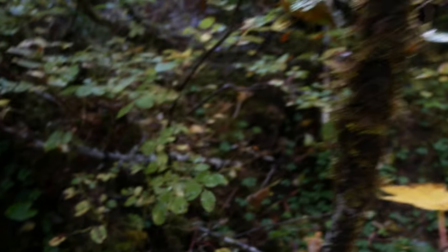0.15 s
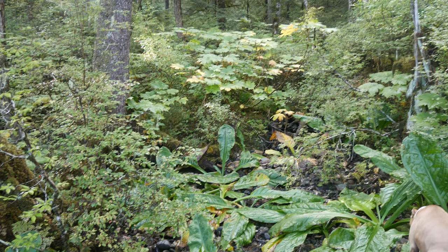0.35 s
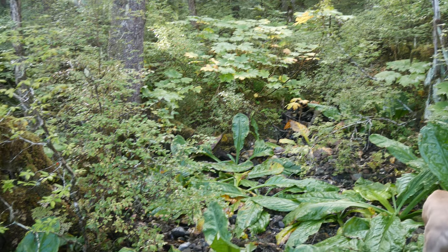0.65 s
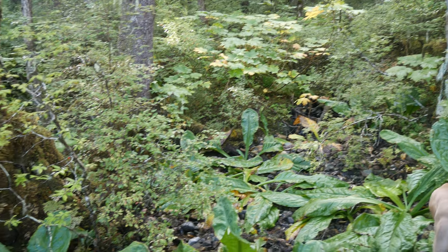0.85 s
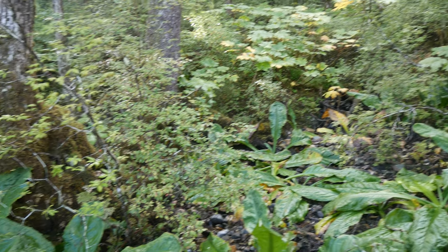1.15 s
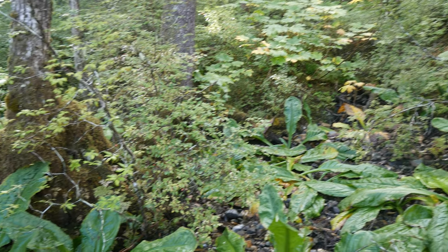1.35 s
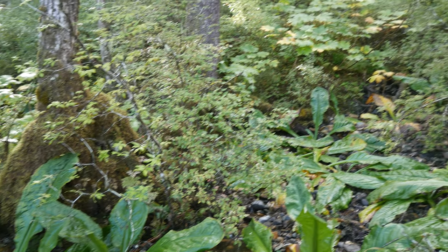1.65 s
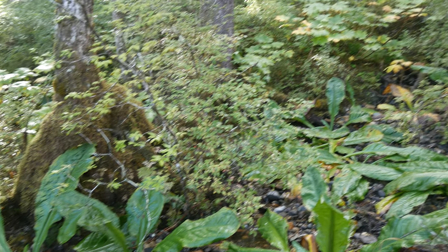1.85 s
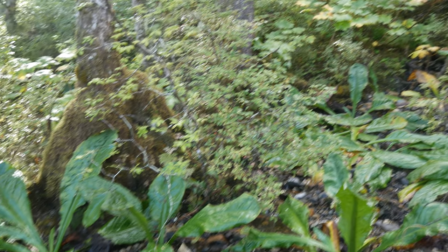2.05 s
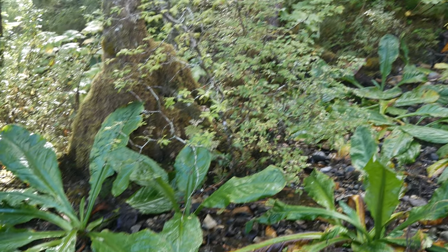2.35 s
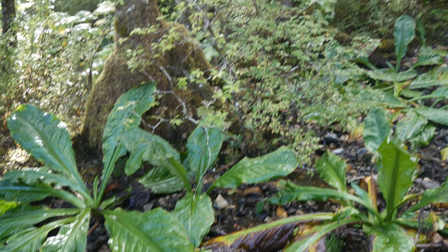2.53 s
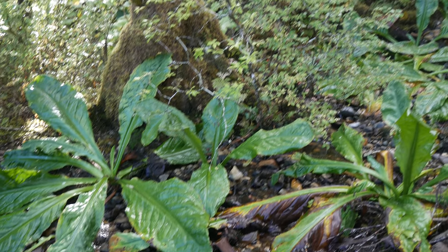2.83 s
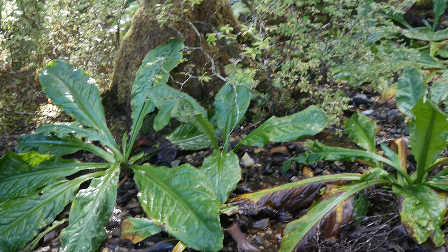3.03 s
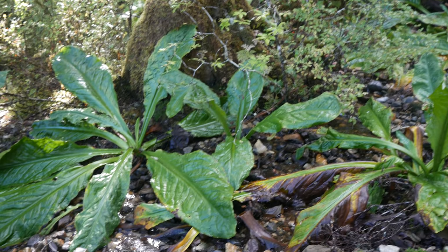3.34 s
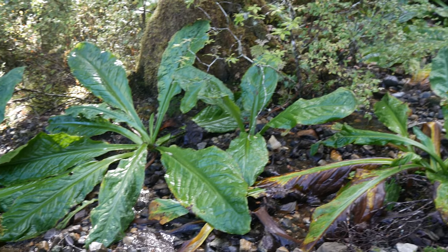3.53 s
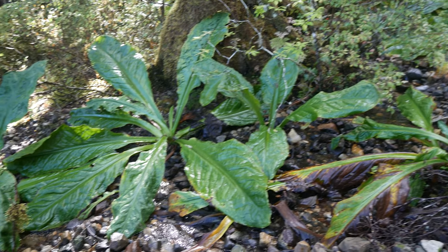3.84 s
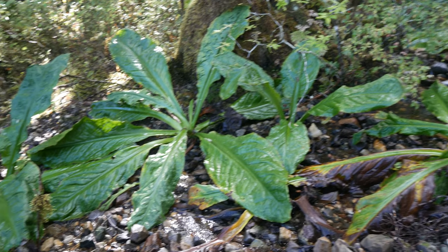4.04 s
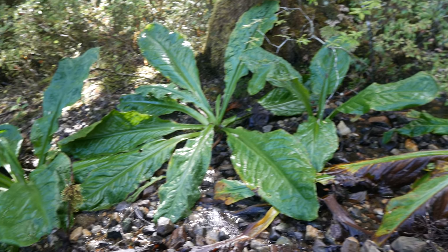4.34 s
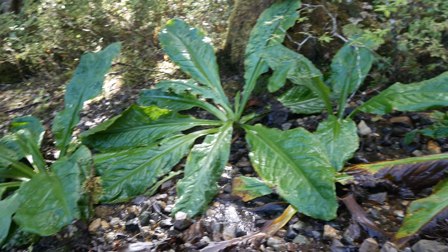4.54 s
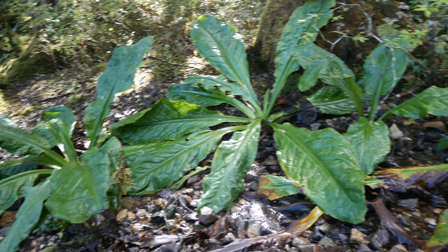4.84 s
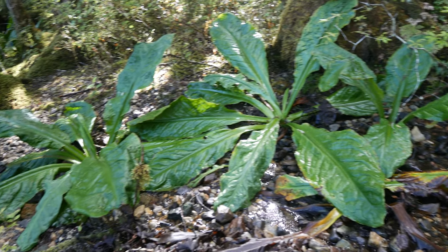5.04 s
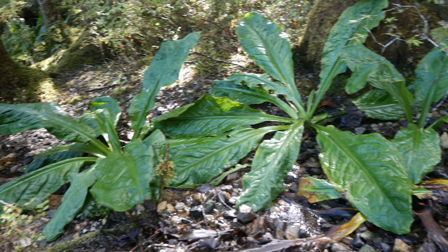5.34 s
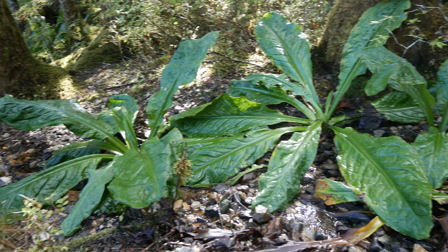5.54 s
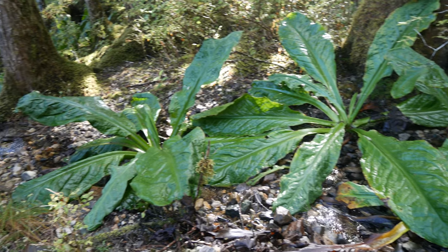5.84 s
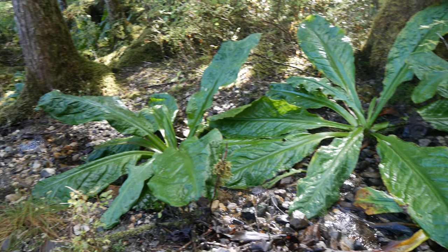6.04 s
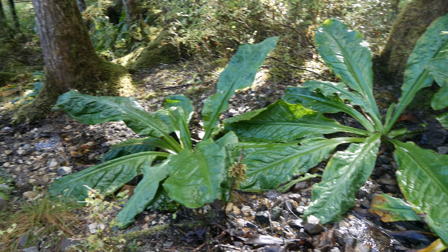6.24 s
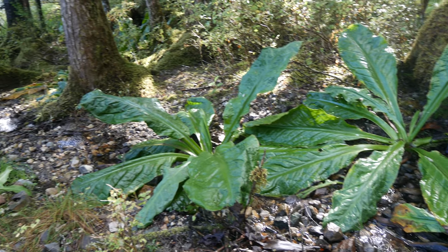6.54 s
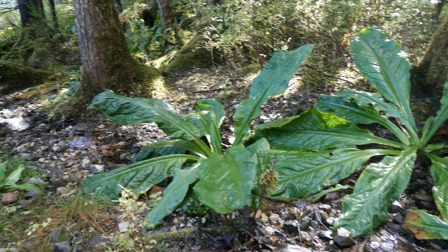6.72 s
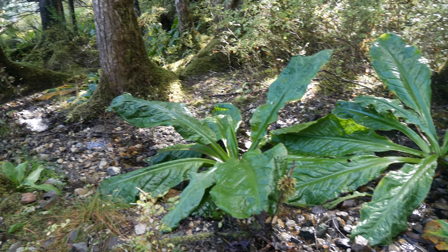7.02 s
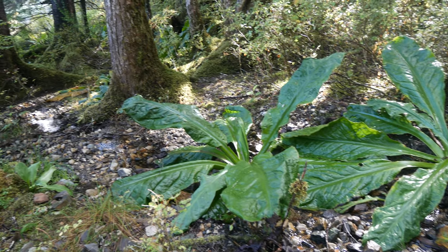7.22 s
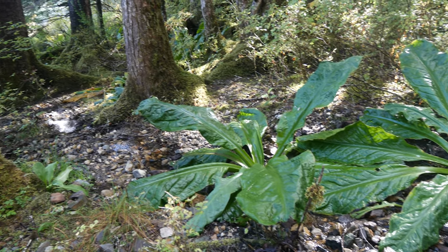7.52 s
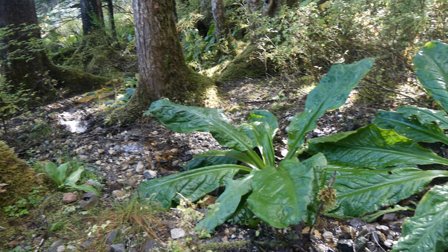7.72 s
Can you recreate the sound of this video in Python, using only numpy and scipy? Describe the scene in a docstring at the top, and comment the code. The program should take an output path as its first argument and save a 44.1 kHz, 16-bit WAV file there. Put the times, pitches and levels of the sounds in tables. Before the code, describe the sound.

Scuffing fingers and thumps on the casing open the scene, followed by a quarter-second of complete silence. A small stream then babbles and fizzes steadily outdoors, fairly near, with irregular plinks, ticks and rounder plops. A crisp click comes early, then a quick cluster of leaf crunches with knocks. Faint low hand rumble and occasional dull thuds continue at the microphone while the water gradually softens to the end.

```python
"""A small stream trickles over gravel in a damp forest, heard from a hand-held camera.
At first the camera is fumbled: bumps, rubs and creaks of coloured noise, and short taps. Then all sound drops out briefly.
The stream enters after that: noise for far water, swarms of gliding tones for bubbles, single tones for drips and plops.
As the camera pans slowly away the water gets softer overall; gritty noise makes a sharp click and crunching leaves.
Low rumble and soft thuds of the grip, which are short tones falling in pitch, carry on to the end."""
import sys
import numpy as np
from scipy import signal
from scipy.fft import rfft, irfft, next_fast_len
from scipy.io import wavfile
from scipy.ndimage import uniform_filter1d, map_coordinates

SR = 44100
rng = np.random.default_rng(int(sys.argv[2]) if len(sys.argv) > 2 else 0)


def unload_wav(signal):
    """Save mono or channel-first audio to the path in sys.argv[1] as 16-bit WAV at rate SR, clipped to [-1, 1]."""
    wavfile.write(
        sys.argv[1],
        SR,
        np.round(np.clip(np.atleast_2d(signal).T, -1, 1) * 32767).astype(np.int16),
    )


N = 347314  # length in samples
TOP_HZ = 15850  # nothing is kept from here up

# All colours below give relative levels; the noise is brought to rms 1 afterwards.
# When the sound drops out: start [t/s], end [t/s]
DROPOUT = (.289, .5562)
# Colour of the hand tremor on the housing: [f/Hz, level/dB]
RUMBLE_COLOUR = [(3, -23), (8, -13.5), (14, 4), (23, -9), (33, -12), (65, -16), (100, -20.5), (190, -25),
                 (300, -29), (500, -81)]
# Strength of the tremor, before its random wobble: [t/s, level/dB]
TREMOR = [(0.56, -60), (1.04, -52.5), (1.5, -58), (1.93, -49.5), (3.1, -55), (3.8, -51), (5, -56),
          (6.2, -57), (6.84, -54.5), (7.4, -60), (7.88, -54)]
# Strength of the fumbling: [t/s, bumping level/dB, rubbing level/dB, creak level/dB]
FUMBLE = [(0.0, -38, -35.5, -62), (0.046, -40.5, -36, -55), (0.094, -35, -40.5, -37.5),
          (0.118, -43, -42.5, -38), (0.142, -45.5, -42, -39), (0.176, -43.5, -44.5, -51.5),
          (0.28, -34, -43, -43), (0.29, -26.5, -52.5, -41.5)]
# Colour of the camera swinging in the hand: [f/Hz, level/dB]
BUMP_COLOUR = [(3, -7), (16, 2), (26, -9), (38, -0.5), (52, -16), (100, -18), (200, -24), (400, -56.5)]
# Colour of fingers on the housing: [f/Hz, level/dB]
RUB_COLOUR = [(71, -37.5), (120, -13), (964, -8.5), (1570, -8), (1670, -6), (1780, -9), (4650, -15),
              (11900, -24.5), (15800, -32.5)]
# Colour of the housing as it flexes: [f/Hz, level/dB]
CREAK_COLOUR = [(70, -28), (150, -11.5), (330, -8.5), (470, -5), (650, -13), (1100, -15.5), (1800, -42.5)]
# Thuds of the grip, before their tail: [t/s, peak level/dB, pitch f/Hz, rise t/ms]
THUDS = [(1.08, -37.5, 366, 2.3), (1.764, -33.5, 328, 2.1), (1.784, -37, 422, 2.1), (1.797, -33, 442, 3.3),
         (1.813, -40, 423, 2.7), (1.862, -35.5, 297, 1.8), (2.688, -50.5, 225, 4.3), (3.73, -51, 326, 9.3),
         (4.105, -38.5, 226.5, 3.6), (4.108, -41, 396, 3.7), (4.113, -34.5, 128, 4.1),
         (4.142, -55, 150, 4.3), (5.217, -47.5, 113, 6), (5.778, -51.5, 136, 5.4), (5.971, -49.5, 102, 6),
         (6.101, -34.5, 434, 0.58), (6.598, -47.5, 149, 3.5), (6.9525, -37.5, 706, 1.4),
         (7.557, -54, 120, 7.1)]
# Bursts of leaf litter, and one sharp broadband click at 0.63 s, before the rise and fall shape them:
# [t/s, level/dB, rise t/ms, fall t/ms]
CRUNCHES = [(0.12, -32.5, 0.55, 3.1), (0.138, -30.5, .5, 3), (0.555, -34.5, 0.83, 22),
            (0.6306, -26.5, .1, 1.5), (1.74, -44, 8, 20), (1.765, -43, 2.6, 19), (1.7842, -26, 1.5, 6.8),
            (1.797, -26.5, 4, 11.6), (1.8107, -28, 2, 4.1), (1.861, -24.5, 0.62, 4.1),
            (4.352, -41, 0.27, 1.4), (6.9523, -33, 0.525, 3.4)]
# Colour of the leaf litter and the click: [f/Hz, level/dB]
LITTER_COLOUR = [(290, -10), (500, -4.5), (677, -6.5), (1400, -0.5), (3680, -7.5), (4250, -11.5),
                 (5280, -17.5), (11900, -22), (15800, -35)]
# Short taps and clicks of the fumbled camera, then the loudest bubbles and splats, before impact and tail:
# [t/s, peak level/dB, pitch f/Hz, rise t/ms]
TAPS_AND_DROPS = [(0.015, -30.5, 2720, 1.0), (0.0286, -25, 2010, .34), (0.1386, -31, 2170, .44),
                  (0.1384, -26.5, 780, .7), (0.154, -33.5, 1930, 0.74), (0.5576, -23.5, 1055, 0.83),
                  (0.6299, -16, 3920, .073), (0.644, -33, 2300, 1.1), (0.6432, -27, 6640, .087),
                  (0.684, -31, 6950, .09), (0.7165, -31, 6330, .37), (0.7368, -30, 7910, .27),
                  (0.8275, -31, 6800, .27), (0.9248, -28.5, 6640, 0.16), (1.067, -36, 1750, 2.0),
                  (1.0747, -31, 1630, 1.1), (1.1892, -35, 2390, 1.0), (1.213, -38, 2010, 2.1),
                  (1.2482, -28.5, 8030, 0.18), (1.3422, -28, 7460, 0.3), (1.3834, -30.5, 2780, .76),
                  (1.4771, -29, 3930, .38), (1.484, -26.5, 2150, 1.75), (1.591, -34.5, 1690, 3.2),
                  (1.714, -37.5, 2140, 3.7), (1.8607, -31.5, 4260, .81), (1.954, -29, 2670, 0.33),
                  (1.9963, -31, 6530, .45), (2.132, -32.5, 2370, 0.84), (2.1704, -30, 6400, 0.27),
                  (2.206, -28, 6850, .21), (2.4323, -28, 1970, .39), (2.6583, -33, 7650, 0.21),
                  (2.6994, -37, 1750, 5.4), (2.704, -24, 3520, 0.37), (2.722, -34, 2090, 1.8),
                  (2.75, -34.5, 1470, 2), (2.8431, -26.5, 2400, 0.43), (2.863, -28.5, 2120, 1.0),
                  (2.884, -39, 1660, 2.4), (2.9055, -35, 5510, .53), (2.93, -35.5, 1580, 2.7),
                  (2.97, -28, 1900, 0.45), (3.071, -39.5, 2730, 2.2), (3.1032, -29, 2810, .21),
                  (3.1536, -28, 1630, 1.6), (3.159, -34, 1720, 1.7), (3.3, -26.5, 7250, .091),
                  (3.32, -35.5, 1820, 1.1), (3.4926, -25, 4700, 0.12), (3.5195, -35.5, 4960, .95),
                  (3.5533, -27.5, 6250, 0.14), (3.6405, -25, 2410, 0.46), (3.647, -26, 1540, 2.5),
                  (3.847, -31.5, 1900, 0.79), (3.999, -36, 4630, .6), (4.1539, -32.5, 7950, .43),
                  (4.3529, -26.5, 7570, .2), (4.351, -31, 3140, 0.3), (4.392, -33, 7900, 0.31),
                  (4.6927, -35, 925, 2.2), (4.948, -31.5, 7700, .25), (5.0279, -40, 1520, 1.5),
                  (5.0354, -38, 2900, 1.94), (5.07, -40, 2120, 2.1), (5.093, -43, 1750, 3.1),
                  (5.11, -39, 2190, 3.1), (5.137, -42, 1780, 2.1), (5.164, -38, 2000, .92),
                  (5.169, -35, 4800, .42), (5.1837, -25, 4760, .54), (5.2685, -26, 5200, .36),
                  (5.2727, -36.5, 1180, 1.8), (5.397, -26, 2580, 0.35), (5.436, -33, 1640, 2.1),
                  (5.7375, -32.5, 5130, 0.49), (5.795, -31, 2260, 0.45), (5.8578, -31.5, 4800, 0.9),
                  (5.8759, -31, 4900, .72), (5.8774, -26.5, 1660, 1.8), (5.883, -26.5, 1920, 0.93),
                  (5.954, -31.5, 4560, .29), (6.0044, -28, 1650, 0.66), (6.03, -37.5, 1010, 3.13),
                  (6.047, -24.5, 4730, 0.16), (6.18, -30, 2960, .61), (6.1869, -33.5, 8470, .53),
                  (6.4618, -33, 1450, 1.76), (6.61, -35.5, 4000, .72), (6.61, -29, 1730, .99),
                  (6.649, -33, 1230, 1.7), (6.7121, -30, 2380, .4), (6.953, -36, 1070, .8),
                  (6.953, -38, 2140, 0.41), (7.0058, -31, 3140, .61), (7.03, -32.5, 4500, .46),
                  (7.0882, -33.5, 6900, .35), (7.232, -38, 4200, 1.52), (7.29, -31.5, 1700, 1.5),
                  (7.2984, -28, 7700, .51), (7.3315, -35.5, 2400, 1.1), (7.474, -30, 2950, 0.21),
                  (7.476, -31, 1710, 0.38), (7.49, -32.5, 8500, 0.22), (7.5594, -40, 2840, .9),
                  (7.6688, -37.5, 1650, 1.54)]
# Turning away from the water: [t/s, level/dB], scaled for each layer by its share
TURNING_AWAY = [(0.56, 0), (1.1, -0.5), (1.9, 0), (2.7, -2), (3.1, -3), (3.6, -2), (4.3, -3.5), (4.9, -3.5),
                (5.8, -3.5), (6.8, -4), (7.88, -6)]
# Gurgle, babble, fizz, spray: [starting level/dB, share: dB lost for each dB of turning away]
LAYERS = [(-54.5, 1.8), (-45, 1.0), (-50, 0.35), (-58, 1)]
# Colour of the far water: [f/Hz, level/dB]
WASH_COLOUR = [(88, -58), (150, -19.5), (259, -5), (382, -9), (543, -4.5), (714, -6), (1750, -2),
               (2850, -7.5), (4640, -9), (6720, -13.5), (8320, -13), (13300, -19), (14900, -24),
               (15800, -47)]
# Left-right difference compared with the common sound: [f/Hz, level/dB]
SIDEWAYS = [(60, -25.5), (200, -20.5), (700, -19), (1290, -26.5), (2380, -21.5), (4400, -18.5), (8120, -15),
            (15000, -8)]


def amp(db):
    """Turn decibels into a plain gain."""
    return 10 ** (np.asarray(db) / 20)


def unit(x):
    """Scale a sound to rms 1."""
    return x / np.sqrt(np.mean(x ** 2) + 1e-20)


def along(points, hz):
    """Read a value at each frequency from (f, value) points, on a log frequency axis."""
    f, value = np.transpose(points)
    return np.interp(np.log(hz + 1), np.log(f + 1), value)


def curves(rows):
    """Join the rows into one curve over time for each column after the time."""
    t, *columns = np.transpose(rows)
    return [np.interp(np.arange(N) / SR, t, column) for column in columns]


def wobble(rate):
    """A smooth random curve with `rate` random points a second."""
    knots = rng.standard_normal(int(N * rate / SR) + 4)
    return map_coordinates(knots, [np.arange(N) * rate / SR])


def filtered(x, response):
    """Multiply each frequency of a sound by a gain."""
    size = next_fast_len(N + 8192)
    gain = response(np.fft.rfftfreq(size, 1 / SR))
    return irfft(rfft(x, size) * gain, size)[..., :N]


def noise(colour, patchy_db):
    """Coloured noise of rms 1 whose gain varies in random patches of time and frequency."""
    z = signal.stft(rng.standard_normal(N), nperseg=256)[2]
    patches = rng.standard_normal(z.shape)
    for axis in (0, 1):
        patches = uniform_filter1d(patches, 5, axis)
    x = signal.istft(z * amp(patchy_db * unit(patches)), nperseg=256)[1][:N]
    return unit(filtered(x, lambda hz: amp(along(colour, hz))))


def blips(s, db, hz, rise_ms, glide, size):
    """Tones that swell and die away over `size` samples; pitch climbs if glide is positive, else falls."""
    t = np.arange(size) / SR
    u = t * 1000 / np.clip(rise_ms, .03, 20)[:, None]  # time counted in rises
    pitch = hz[:, None]
    cycles = pitch * t * (1 + glide * (u / 2 - 1.5))
    swell = u * np.exp(1 - u)  # peaks at 1
    playable = pitch * (1 + glide * u) < SR / 2 - 1
    wave = amp(db)[:, None] * swell * np.sin(2 * np.pi * cycles) * playable
    at = np.round(s * SR).astype(int)[:, None] + np.arange(size)
    return np.bincount(at.ravel(), wave.ravel(), N + size)[:N]  # add up all the tones


def swarm(count, centre_hz, octaves, cycles, spread_db, glide, size):
    """Bubbles at random times, with pitches spread in octaves and uneven levels; rms 1."""
    when, loud = rng.random((count, 2)).T
    pitch, life = rng.standard_normal((count, 2)).T
    hz = np.clip(centre_hz * 2 ** (octaves * pitch), 150, 14000)
    db = np.minimum(-spread_db * np.log(loud + 1e-9), 3.3 * spread_db)
    db = db - 2.76 * life - 1.5 * pitch ** 2  # long ringers and odd sizes are softer
    rise_ms = cycles * 1000 / hz * np.exp(0.53 * life)
    return unit(blips(when * N / SR, db, hz, rise_ms, glide, size))


def noisy_tail(x, t60, level_db):
    """Add a short noisy tail to each sound; it dies by 60 dB in t60 seconds."""
    t = np.arange(SR // 10) / SR
    tail = rng.standard_normal(len(t)) * amp(-60 * t / t60) * (t > .0015)
    tail = tail / np.linalg.norm(tail)
    return x + amp(level_db) * signal.fftconvolve(x, tail)[:N]


def hand_rumble():
    """Hand tremor shakes the housing: low noise with a wandering level."""
    tremor_db, = curves(TREMOR)
    return noise(RUMBLE_COLOUR, patchy_db=0.8) * amp(tremor_db + 0.87 * wobble(5.6))


def fumbling():
    """The camera swings, fingers rub it and its housing flexes: three noises at the start."""
    bump_db, rub_db, creak_db = curves(FUMBLE)
    early = np.arange(N) / SR < DROPOUT[1]
    bump = amp(bump_db) * noise(BUMP_COLOUR, patchy_db=0.7)
    gritty = noise(RUB_COLOUR, patchy_db=-0.8) * amp(1.9 * wobble(200))
    rub = amp(rub_db) * unit(gritty)
    creak = amp(creak_db) * noise(CREAK_COLOUR, patchy_db=-0.1)
    return early * (bump + rub + creak)


def grip_thuds():
    """The grip gives soft knocks: short tones that fall in pitch, with a noisy tail."""
    knocks = blips(*np.transpose(THUDS), glide=-0.075, size=3000)
    return noisy_tail(knocks, t60=0.21, level_db=-2.0)


def crunches_and_click():
    """Leaf litter gives way in short gritty bursts of fast-wobbling noise; one burst is a sharp click."""
    grit = unit(noise(LITTER_COLOUR, patchy_db=0.0) * amp(2.5 * wobble(600)))
    t = np.arange(N) / SR
    shape = np.zeros(N)
    for s, db, rise_ms, fall_ms in CRUNCHES:
        age_ms = np.maximum(t - s, 0) * 1000
        shape += amp(db) * (1 - np.exp(-age_ms / rise_ms)) * np.exp(-age_ms / fall_ms)
    return shape * grit


def taps_and_drops():
    """Taps of the fumbled camera, then drips and plops: short rising tones; faint ones fall at random."""
    s, db, hz, rise_ms = np.transpose(TAPS_AND_DROPS)
    ring = blips(s, db, hz, np.maximum(rise_ms, .1), glide=0.024, size=1000)
    # each also gets a small bright impact
    impact = blips(s, db - 11.5, 1.5 * hz, np.maximum(.5 * rise_ms, .1), glide=0.0064, size=300)
    plinks = amp(-58) * swarm(count=110, centre_hz=1916, octaves=0.416, cycles=4.85,
                              spread_db=1.5, glide=0.033, size=1000)
    ticks = amp(-60.5) * swarm(count=45, centre_hz=4500, octaves=.12, cycles=2.2,
                               spread_db=2.5, glide=0.034, size=300)
    spits = amp(-64) * swarm(count=25, centre_hz=7700, octaves=0.13, cycles=2.9,
                             spread_db=-0.5, glide=0.046, size=200)
    return noisy_tail(ring + impact + plinks + ticks + spits, t60=0.035, level_db=-9.0)


def stream():
    """Far water merges into noise; nearer bubbles gurgle, babble and fizz, and fine spray ticks in flurries."""
    away_db, = curves(TURNING_AWAY)
    gurgle_db, babble_db, fizz_db, spray_db = [db + share * away_db for db, share in LAYERS]
    wash = noise(WASH_COLOUR, patchy_db=2.5) * amp(1.0 * wobble(12))
    # split the wash into four bands, one for each layer
    low, to_mid, to_high = [filtered(wash, lambda hz: 1 / (1 + (hz / edge_hz) ** 4))
                            for edge_hz in (650, 3200, 9000)]

    bubbles = swarm(count=600, centre_hz=475, octaves=0.497, cycles=1.0,
                    spread_db=3.0, glide=0.059, size=1200)
    gurgle = amp(-1.5) * unit(low) + amp(-6.5) * bubbles
    bubbles = swarm(count=2400, centre_hz=1768, octaves=0.557, cycles=3.1,
                    spread_db=4.5, glide=0.026, size=600)
    babble = amp(-2.5) * unit(to_mid - low) + amp(-4.0) * bubbles
    bubbles = swarm(count=4000, centre_hz=5360, octaves=0.617, cycles=2.9,
                    spread_db=5.0, glide=0.017, size=300)
    fizz = amp(-3.0) * unit(to_high - to_mid) + amp(-6) * bubbles
    droplets = swarm(count=2500, centre_hz=10500, octaves=0.49, cycles=0.66,
                     spread_db=5.0, glide=0.011, size=60)
    spray = amp(-2.0) * unit(wash - to_high) + amp(-3.0) * droplets

    flurry = amp(1.17 * wobble(25) + 0.61 * wobble(60))
    lower = amp(gurgle_db + 1.4 * wobble(2.93)) * gurgle + amp(babble_db + 0.98 * wobble(30)) * babble
    upper = flurry * (amp(fizz_db) * fizz + amp(spray_db) * spray)
    return lower + upper


def widened(common):
    """A faint, diffuse stereo side: the common sound, recoloured and given random phase."""
    hz, _, z = signal.stft(common, SR, nperseg=512)
    random_phase = np.exp(2j * np.pi * rng.random(z.shape))
    z = z * amp(along(SIDEWAYS, hz))[:, None] * random_phase
    side = signal.istft(z, SR, nperseg=512)[1][:N]
    return np.array([common + side, common - side])


def scene():
    """Add up all sources, with the stream only from the dropout on, and spread them in stereo."""
    late = np.arange(N) / SR > DROPOUT[0]
    handling = hand_rumble() + fumbling() + grip_thuds()
    return widened(handling + crunches_and_click() + taps_and_drops() + late * stream())


def record(dry):
    """Mute the dropout with very short fades, then cut everything from TOP_HZ up."""
    t = np.arange(N) / SR
    outside = np.maximum(DROPOUT[0] - t, t - DROPOUT[1])
    on = np.clip(outside / 0.00042, 0, 1)  # fades of 0.42 ms
    return filtered(dry * on, lambda hz: hz < TOP_HZ)


dry = scene()
out = record(dry)
unload_wav(out)
```